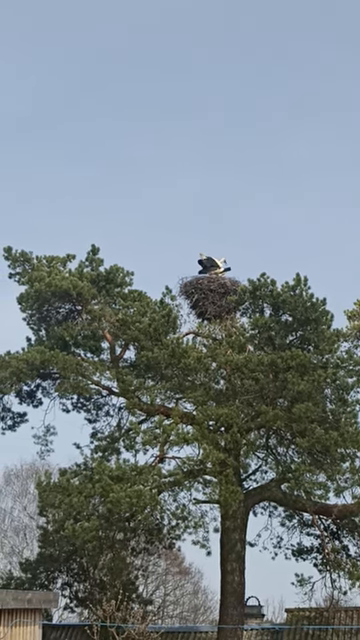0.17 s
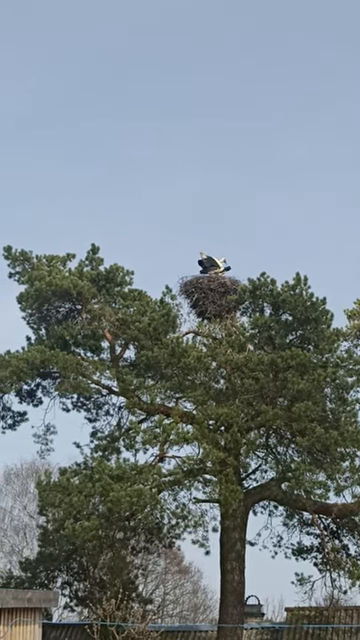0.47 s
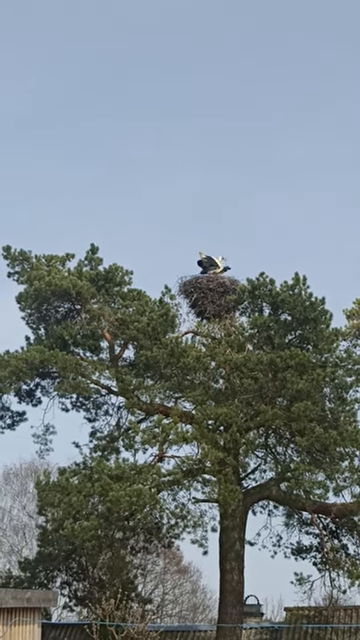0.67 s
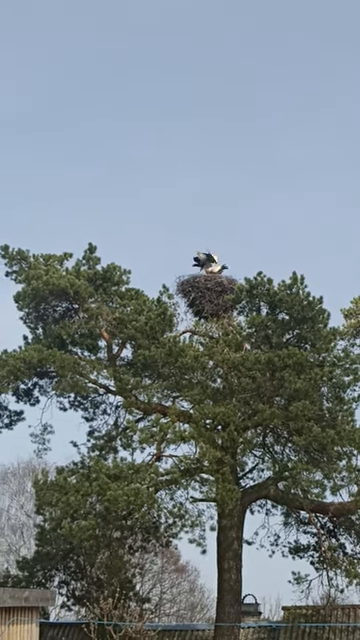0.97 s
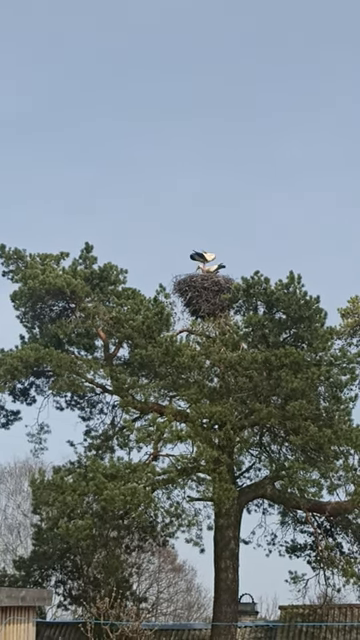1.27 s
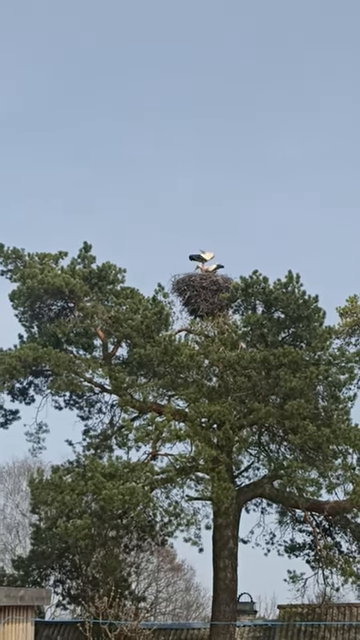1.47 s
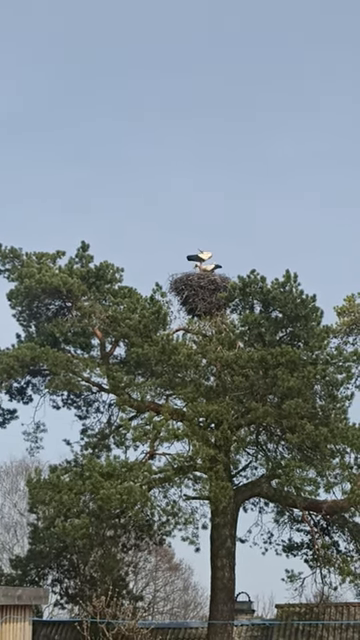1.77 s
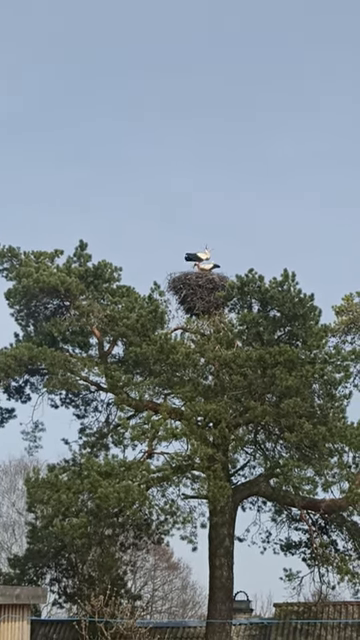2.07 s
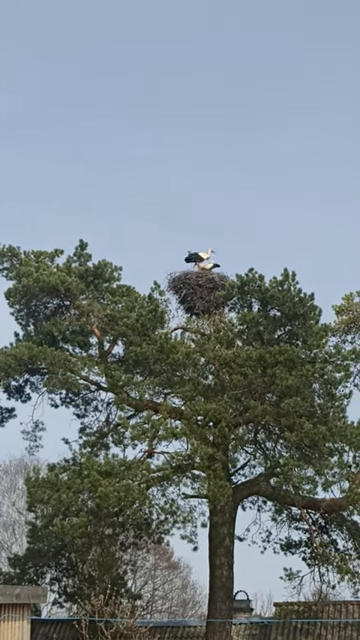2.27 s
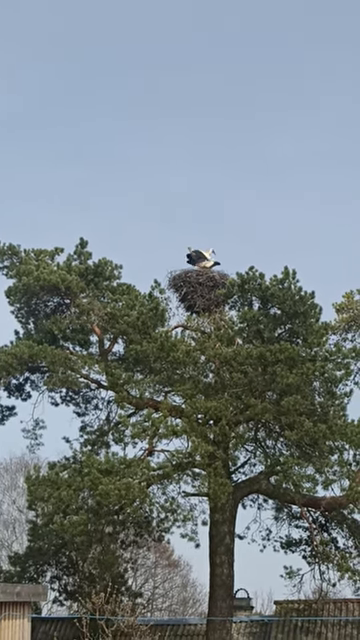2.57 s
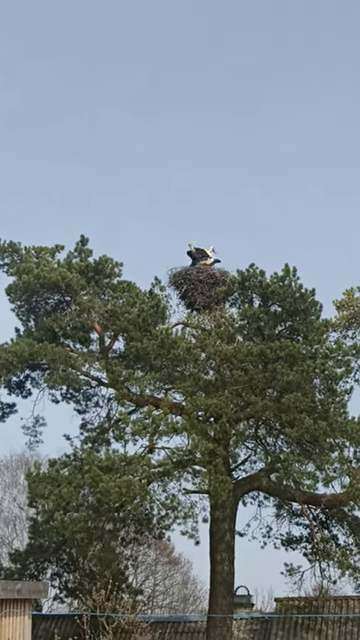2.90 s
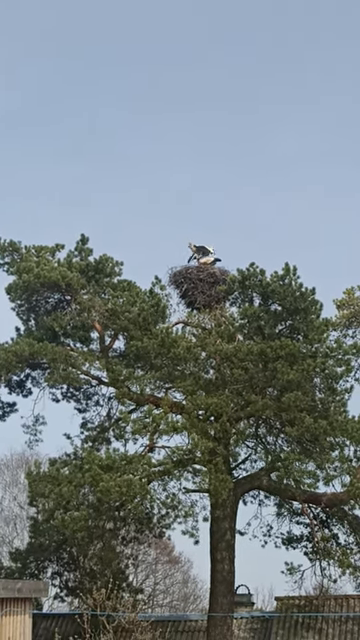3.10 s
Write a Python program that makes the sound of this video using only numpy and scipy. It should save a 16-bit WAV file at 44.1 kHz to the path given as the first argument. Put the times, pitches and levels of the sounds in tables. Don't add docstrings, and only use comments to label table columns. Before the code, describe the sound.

Rapid wooden bill clacks from two storks overlap in uneven rhythm throughout, the quicker bird's tone turning duller mid-way then sharp again; distant outdoor phone pickup, soft hum, a low wind pop and light gusts.

```python
import sys
import numpy as np
from scipy import signal
from scipy.fft import rfft, irfft
from scipy.io import wavfile
from scipy.ndimage import uniform_filter1d

SR = 44100
rng = np.random.default_rng(int(sys.argv[2]) if len(sys.argv) > 2 else 0)


def to_wav(s):
    ch = np.atleast_2d(s).T
    pcm = np.round(np.clip(ch, -1, 1) * 32767)
    wavfile.write(sys.argv[1], SR, pcm.astype(np.int16))


def amplitude_ratio(level_db):
    exponent = np.asarray(level_db, float) / 20
    return 10 ** exponent


N = 142884
t = np.arange(N) / SR


def level(x, db):
    return x * amplitude_ratio(db) / np.sqrt(np.mean(x ** 2))


def band(x, hz, width):
    return signal.lfilter(*signal.iirpeak(hz, hz / width, fs=SR), x)


def highpass(x, hz, order):
    return signal.sosfilt(signal.butter(order, hz, "high", fs=SR, output="sos"), x)


def walk(rate, channels):
    k = int(SR / rate)
    noise = rng.standard_normal((channels, N))
    return level(uniform_filter1d(uniform_filter1d(noise, k), k), 0)


def late(x, seconds, db):
    return np.pad(x, ((0, 0), (int(seconds * SR), 0)))[:, :N] * amplitude_ratio(db)


def crack_noise(length):
    left, other = highpass(rng.standard_normal((2, length)), 5500, order=2)
    shared = 0.5
    return np.array([left, shared * np.roll(left, 2) + (1 - shared) * other])


def clatter(snaps, modes, contacts):
    SNAP_DB, CRACK_DB, RATTLE_DB = -4, 13, -15
    CRACK_S, RATTLE_S, PUSH_S, LONGEST_T60_S = .0005, .0035, .00015, .0122
    MODE_SPREAD_DB, PITCH_SPREAD, START_RAD = 0.5, .017, 0.26
    length = 1024
    out = np.zeros((2, N + length))
    hz, db, t60, pan, lag = np.array(modes).T[:, :, None]
    t60 = np.minimum(t60, LONGEST_T60_S)
    side = np.array([-.5, .5])[:, None, None]
    for s, snap_db, crack_db, bill_db, tip_db in snaps:
        vary = rng.standard_normal((len(modes), 2, 1))
        grit = crack_noise(length)
        i = int(s * SR)
        gain = amplitude_ratio(db + MODE_SPREAD_DB * vary[:, 0] + pan * side)
        gain[:, 3:5] *= amplitude_ratio(np.array([[bill_db], [tip_db]]))
        for after, hit_db, tick_db in contacts:
            u = np.maximum(np.arange(length) / SR - (s - i / SR) - after, 0)
            phase = 2 * np.pi * hz * (1 + PITCH_SPREAD * vary[:, 1]) * u + START_RAD - lag * side
            fade = amplitude_ratio(-60 * (u / t60) ** 1.45)
            ring = (gain * np.sin(phase) * fade).sum(axis=1) * (1 - np.exp(-u / PUSH_S))
            crack_fade = np.exp(-u / CRACK_S) + amplitude_ratio(RATTLE_DB) * np.exp(-u / RATTLE_S)
            crack = amplitude_ratio(CRACK_DB + crack_db + tick_db) * grit * crack_fade * (u > 0)
            out[:, i:i + length] += amplitude_ratio(SNAP_DB + snap_db) * (amplitude_ratio(hit_db) * ring + crack)
    return highpass(out[:, :N], 500, order=3)


# (time [s], level [dB], crack under the level [dB], mid-bill ring [dB], bill-tip ring [dB])
SLOW_SNAPS = [(0.0751, -24.5, -39, 8, -7), (0.2223, -23, -48, 1.5, -3), (0.3657, -25, -46, 3, -1.5),
              (0.5096, -26.5, -52, -6, -1), (0.6533, -26.5, -43, -1, -4), (0.7958, -27.5, -41, -4, -1.5),
              (0.9435, -26, -42, 4, -3), (1.0891, -26.5, -43, 6, -1), (1.2336, -24.5, -49, 1, -6),
              (1.3778, -24, -39, 5.5, 1), (1.52, -23, -34, 5, -2), (1.6633, -23.5, -41, 7.5, -2.5),
              (1.805, -22.5, -42, 6, -3), (1.9478, -23.5, -38, 2, -0.5), (2.0915, -24, -40, 4.5, -0.5),
              (2.2365, -25, -41, 4.5, 3), (2.383, -25, -35, 5, 1), (2.5298, -27, -37, 4, 3),
              (2.6772, -29, -38, -9, -2), (2.8249, -26, -49, 4, -2), (2.9723, -28, -45, 2.5, -4),
              (3.1188, -26.5, -46, -2.5, -3)]
# (frequency [Hz], level [dB], t60 [s], right minus left [dB], right port's lag [rad])
SLOW_BODY = [
    (762, -9.5, 0.011, 1.8, 0.11),
    (1840, -46, 0.024, 1.5, 0.11),
    (2153, 0.08, 0.0071, 7.4, 0.79),
    (2485, -10, 0.01, 0.74, 0.2),
    (3230, -10.5, 0.011, 0.46, 0.61),
    (4430, -24, 0.015, 1.4, 1.25),
    (586, -14.5, 0.0069, 1.4, 0.092),
    (5620, -24, 0.016, 2.5, 1.78),
    (6490, -27.5, 0.014, 4.3, 3.84),
]
# (time after the snap [s], ring level [dB], crack level [dB])
SLOW_CLOSING = [
    (0, -9, 2.5),
    (.0009, 0, -8),
]


def slow_bird():
    return clatter(SLOW_SNAPS, SLOW_BODY, SLOW_CLOSING)


# (time [s], level [dB], crack under the level [dB], mid-bill ring [dB], bill-tip ring [dB])
BACK_SNAPS = [(0.015, -27.5, -28, 6, 4.5), (0.1198, -28, -33, 7, 5.5), (0.2259, -30.5, -28, 7, -2),
              (0.3282, -28, -35, 4, 2.5), (0.4335, -27.5, -34, 4, 3.5), (0.5377, -28.5, -22, 5, 3),
              (0.6419, -29.5, -27, 4, 4.5), (0.7416, -29.5, -23.5, 8, 4), (0.8357, -30.5, -23.5, 7, 1.5),
              (0.9214, -31.5, -21, 7, 0), (1.0017, -31.5, -23, 7, 0), (2.4444, -27.5, -28.5, 4, -1),
              (2.5465, -27.5, -41, -6, -2), (2.6495, -28.5, -28, -1, -1), (2.7536, -29, -23, 3, -0.5),
              (2.8577, -29, -26.5, 1, -1.5), (2.9615, -29.5, -29.5, -3, -2), (3.0624, -31, -26, -2, 0),
              (3.1636, -30, -24, -4, -2)]
# (frequency [Hz], level [dB], t60 [s], right minus left [dB], right port's lag [rad])
BACK_BODY = [
    (736, -3, 0.0092, 2, 0.055),
    (1813, -10.5, 0.033, -8, 0.11),
    (2088, 2, 0.0093, 4.5, 1.22),
    (2590, -11.5, 0.014, -2, 1.15),
    (3440, -10, 0.016, 4.5, 0.68),
    (2887, -10, 0.03, 14.5, 1.2),
    (1667, -16, 0.0146, -0.5, .3),
    (890, -14.5, 0.0045, -2, .1),
    (4770, -13.5, 0.0047, 6, 1.5),
    (6000, -29.5, 0.013, 13.5, 0.73),
]
# (time after the snap [s], ring level [dB], crack level [dB])
BACK_CLOSING = [
    (0, -0.5, -1),
    (.0015, -8, -10.5),
]


def quick_bird_head_back():
    return clatter(BACK_SNAPS, BACK_BODY, BACK_CLOSING)


# (time [s], level [dB], crack under the level [dB], mid-bill ring [dB], bill-tip ring [dB])
FORWARD_SNAPS = [(1.0784, -33, -45, -3, -10), (1.1581, -30.5, -48, -2.5, -4), (1.2368, -29, -39, -5, 1),
                 (1.3134, -30, -39, -3.5, -4), (1.3932, -31.5, -35, -10.5, -15),
                 (1.4717, -30.5, -33, -4, 1), (1.5512, -29.5, -35, -3, -2.5), (1.6318, -29, -33, -2, -1),
                 (1.7154, -28.5, -33, -2.5, -1), (1.7972, -29.5, -41, -0.5, 2), (1.8797, -28, -36, -4, -3),
                 (1.9672, -27, -41, -3, -7), (2.0565, -27.5, -36, -4.5, -5), (2.1468, -28.5, -36, -3, 0),
                 (2.2407, -29, -32, -2.5, -5), (2.3405, -28.5, -30, -3.5, -0.5)]
# (frequency [Hz], level [dB], t60 [s], right minus left [dB], right port's lag [rad])
FORWARD_BODY = [
    (760, -1.5, 0.0075, 1.3, 0.079),
    (1688, 1.5, 0.0091, 2.1, 0.57),
    (2140, -5, 0.013, 5.7, 1.53),
    (2562, 4, 0.0121, 2.8, 0.95),
    (3100, -5.5, 0.014, 0.71, 0.5),
    (3990, -12, 0.008, 1.8, 0.48),
    (4700, -20.5, 0.0058, 0.9, 1.2),
    (6040, -18, 0.014, 3.1, 1.5),
]
# (time after the snap [s], ring level [dB], crack level [dB])
FORWARD_CLOSING = [
    (0, -12, 0),
    (.0013, 0.5, -1.5),
]


def quick_bird_head_forward():
    return clatter(FORWARD_SNAPS, FORWARD_BODY, FORWARD_CLOSING)


# (delay [s], left level [dB], right level [dB], smear [s])
ECHOES = [
    (.0085, -23, -22, .001),
    (.0125, -22, -22, .001),
    (.0255, -18, -18, .0015),
    (.0295, -21, -21, .0008),
    (.0342, -14, -16, .0008),
    (.058, -22, -22, .003),
    (.0885, -25, -25, .002),
]


def garden(x):
    ECHO_DB, TAIL_DB, TAIL_T60_S, TAIL_TOP_HZ = -1, -10, 0.49, 4600
    u = t[:SR]
    grains = rng.standard_normal((3, SR))
    tail = grains[:2] * amplitude_ratio(-60 * u / TAIL_T60_S) * np.clip(u / .018, 0, 1)
    tail *= amplitude_ratio(TAIL_DB) / np.sqrt((tail ** 2).sum(axis=1, keepdims=True))
    for delay, left_db, right_db, smear in ECHOES:
        echo = grains[2] * np.exp(-((u - delay) / smear) ** 2)
        echo = echo / np.sqrt((echo ** 2).sum())
        tail = tail + amplitude_ratio(ECHO_DB + np.array([[left_db], [right_db]])) * echo
    tail = signal.sosfilt(signal.butter(1, TAIL_TOP_HZ, fs=SR, output="sos"), tail)
    return signal.fftconvolve(x.mean(axis=0, keepdims=True), tail, axes=1)[:, :N]


def facing_walls(x):
    far_wall = late(highpass(x, 2500, order=3), .0885, -13)
    near_shed = late(x, .0338, -17)
    return far_wall + near_shed


# (time [s], half length [s], left level [dB], right level [dB])
GUSTS = [(0.317, 0.022, -74, -77), (.51, 0.058, -55.5, -79), (0.162, 0.021, -70, -61),
         (0.754, 0.06, -77, -67), (0.965, 0.018, -60.5, -52.5), (1.072, 0.024, -56, -61),
         (1.274, 0.022, -69, -67), (1.733, 0.033, -78, -58), (1.996, 0.053, -53.5, -65),
         (2.127, 0.038, -76, -59.5), (2.244, 0.061, -76, -59), (2.388, 0.038, -62, -49),
         (2.501, 0.036, -58, -40.5), (2.556, 0.021, -57, -50), (2.602, 0.02, -60, -38),
         (2.673, 0.026, -67, -48.5), (2.793, 0.058, -59, -60), (3.108, 0.092, -60.5, -57.5)]


def wind():
    WIND_HZ, WIND_WIDTH_HZ, BREEZE_DB, FLUTTER_DB = 85.8, 63.6, -67.5, 2
    POP_S, POP_HZ, POP_T60_S = 1.8425, 105, .03
    rumble = band(rng.standard_normal((2, N)), WIND_HZ, WIND_WIDTH_HZ)
    rumble = level(band(rumble, WIND_HZ * 0.98, WIND_WIDTH_HZ), 0)
    swing = uniform_filter1d(np.abs(signal.hilbert(rumble)), size=400)
    rumble = rumble / swing ** .95
    rumble = level(band(rumble, WIND_HZ * 0.9, WIND_WIDTH_HZ * 1.9), 0)
    force = amplitude_ratio(BREEZE_DB)
    for s, half, left_db, right_db in GUSTS:
        force = force + amplitude_ratio(np.array([[left_db], [right_db]])) * np.exp(-((t - s) / half) ** 2)
    u = np.maximum(t - POP_S, 0)
    pop = np.sin(2 * np.pi * POP_HZ * u) * (1 - np.exp(-u / .003)) * amplitude_ratio(-60 * u / POP_T60_S)
    pop = amplitude_ratio(np.array([[-16], [-38]])) * pop
    return rumble * force * amplitude_ratio(FLUTTER_DB * walk(27, channels=2)) + pop


# (time [s], length [s], start pitch [Hz], fall [Hz])
SONG = [
    (1.335, .055, 4400, 330),
    (1.425, .04, 4100, 120),
]


def songbird():
    out = 0
    for s, length, hz, fall_hz in SONG:
        u = np.clip((t - s) / length, 0, 1)
        tone = np.sin(2 * np.pi * np.cumsum(hz - fall_hz * u) / SR)
        out = out + amplitude_ratio(-70) * np.sin(np.pi * u) * tone
    return out


# (frequency [Hz], density [dB per Hz])
AIR_COLOUR = [
    (100, -2.5),
    (250, -2),
    (500, -3),
    (1200, -7.5),
    (3000, -14.5),
    (6000, -26),
    (9000, -33),
    (16000, -32),
]


def air():
    AIR_DB, SHARED = -60, 0.32
    hz, db = np.array(AIR_COLOUR).T
    f = np.maximum(np.fft.rfftfreq(N, 1 / SR), 20)
    noise = rng.standard_normal((3, N))
    noise = np.sqrt(SHARED) * noise[2] + np.sqrt(1 - SHARED) * noise[:2]
    colour = amplitude_ratio(np.interp(np.log(f), np.log(hz), db)) * np.minimum(f / hz[0], 1) ** 3
    return level(irfft(rfft(noise) * colour, N), AIR_DB) * amplitude_ratio(.8 * walk(3, channels=1))


# (time [s], length [s])
PATCHY_MOMENTS = [(.025, .045), (.085, .03), (.31, .015), (.5, .035), (.62, .02), (.73, .05), (1.32, .08),
                  (1.53, .02), (1.615, .1), (1.78, .035), (1.865, .015), (1.935, .05), (2.35, .09), (3.07, .09)]


def patchy_hiss(x):
    LOW_HZ, DEEPEST_HZ, SHARE = 4500, 8800, .62
    f, s, z = signal.stft(x, SR, nperseg=256)
    on = sum((s > start) & (s < start + length) for start, length in PATCHY_MOMENTS)
    share = SHARE * np.clip((f - LOW_HZ) / (DEEPEST_HZ - LOW_HZ), 0, 1)
    share = share * np.minimum(DEEPEST_HZ / (f + 1), 1)
    dice = rng.random((len(f) // 4 + 1, len(s) // 3 + 1))
    dice = np.kron(dice, np.ones((4, 3)))[:len(f), :len(s)]
    return signal.istft(z * (dice > share[:, None] * on), SR, nperseg=256)[1][:, :N]


def scene():
    slow = slow_bird() + songbird()
    back = quick_bird_head_back()
    forward = quick_bird_head_forward()
    birds = sum(bird + garden(bird) for bird in (slow, back, forward))
    return birds + facing_walls(slow) + wind() + patchy_hiss(air())


def low_pass(x):
    return signal.sosfilt(signal.butter(12, 16620, fs=SR, output="sos"), x)


def record(dry):
    dry = highpass(dry, 56, order=3)
    dry = signal.sosfilt(signal.ellip(8, .2, 50, 15750, fs=SR, output="sos"), dry)
    lift = (amplitude_ratio(7.5) - 1) * band(dry[0], 12050, 1730)
    mix = dry + np.array([lift, 0 * lift])
    return low_pass(mix)


dry = scene()
out = record(dry)
to_wav(out)
```